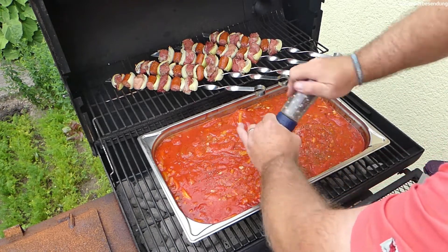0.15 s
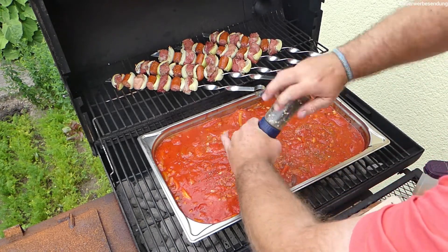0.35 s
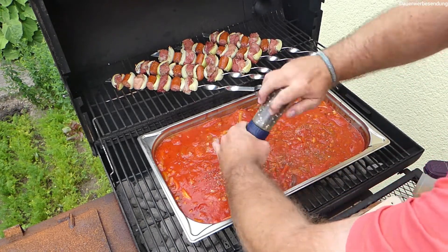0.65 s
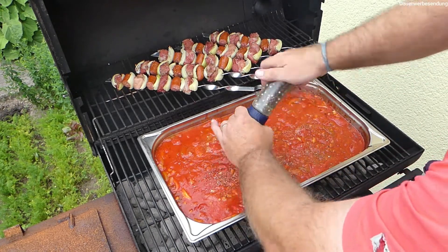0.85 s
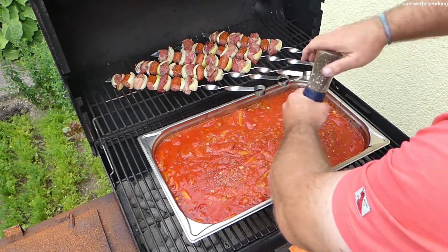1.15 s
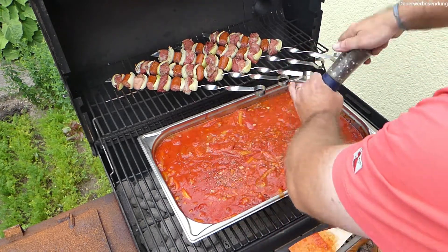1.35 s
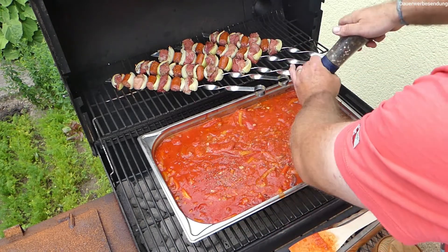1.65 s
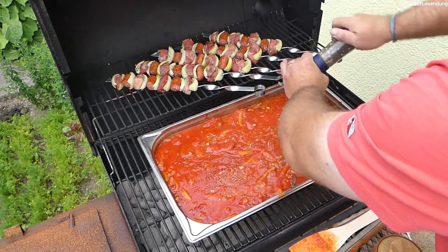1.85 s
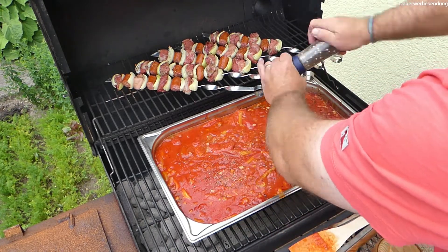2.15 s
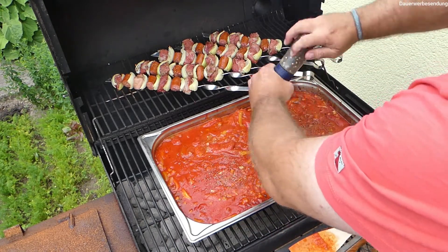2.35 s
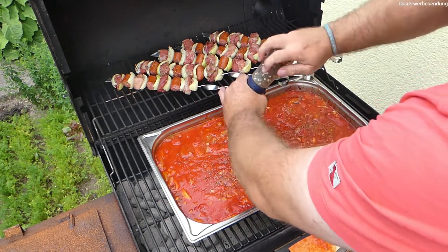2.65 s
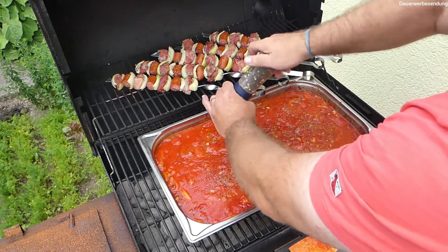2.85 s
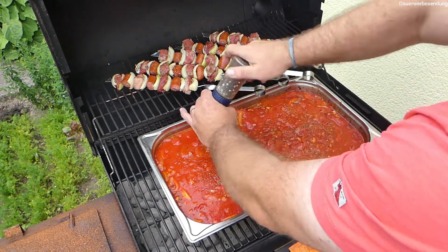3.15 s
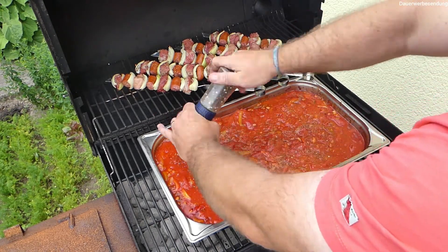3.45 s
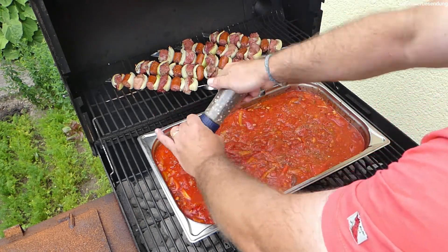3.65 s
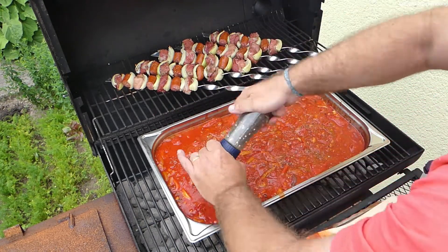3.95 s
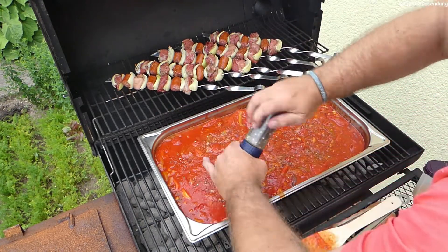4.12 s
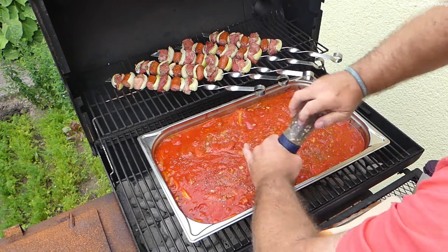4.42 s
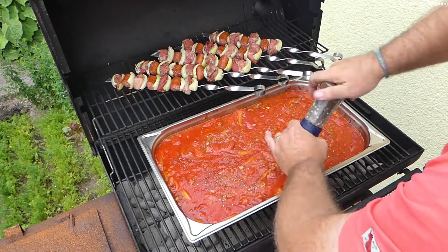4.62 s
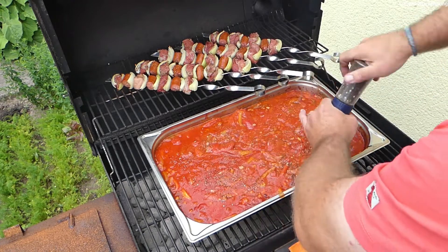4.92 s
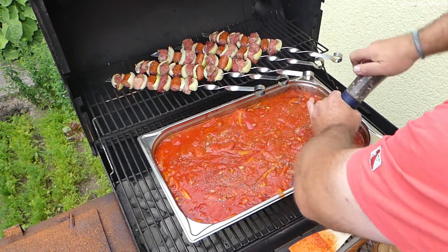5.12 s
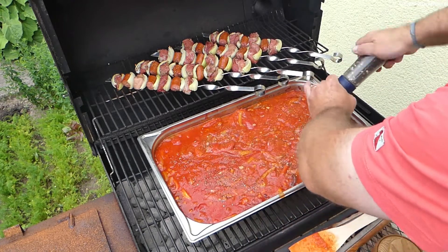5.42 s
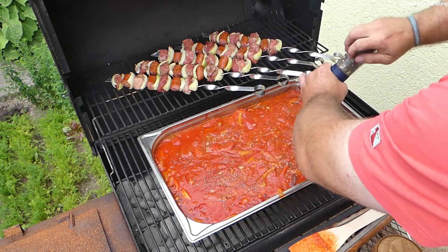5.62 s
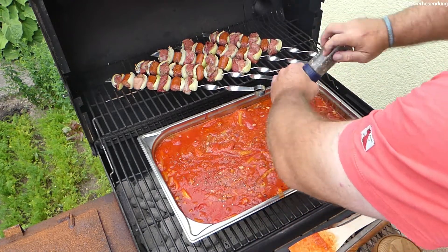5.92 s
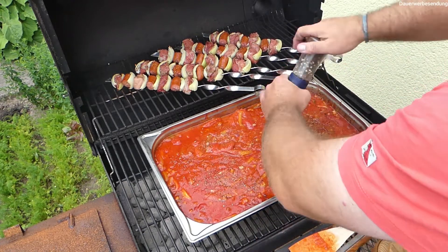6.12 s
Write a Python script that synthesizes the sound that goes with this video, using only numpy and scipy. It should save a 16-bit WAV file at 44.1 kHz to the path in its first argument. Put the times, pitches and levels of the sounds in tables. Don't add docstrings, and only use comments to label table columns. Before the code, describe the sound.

Steady short grinding strokes of a hand pepper mill, about four a second, with corns cracking and rattling above a soft grill flame.

```python
import sys
import numpy as np
from scipy import signal
from scipy.fft import rfft, irfft, next_fast_len
from scipy.io import wavfile
from scipy.ndimage import uniform_filter1d, map_coordinates

SR = 44100
rng = np.random.default_rng(int(sys.argv[2]) if len(sys.argv) > 2 else 0)


def put_to_file(sound):
    columns = np.atleast_2d(sound).T
    safe = np.clip(columns, -1, 1)
    whole_steps = np.round(safe * 32767)
    wavfile.write(sys.argv[1], SR, whole_steps.astype(np.int16))


def natural_amplitude(level_db):
    exponent = np.asarray(level_db, float) / 20
    return 10 ** exponent


N = 276939
CLOCK = np.arange(N) / SR

# hz, level_db (per Hz)
GRIT = [(290, 1), (500, -8.5), (844, -63), (1130, -11), (1990, -22), (2590, -12), (3080, -10), (5130, -4),
        (5600, -1.5), (6860, -4.5), (8920, 0.5), (14200, -9), (15500, -14.5), (16200, -74)]
SPLINTER_HZ = 2630


def unit(x):
    return x / np.sqrt(np.mean(x ** 2) + 1e-20)


def along(points, hz):
    f, value = np.transpose(points)
    return np.interp(np.log(hz + 1), np.log(f + 1), value)


def curves(rows):
    s, *columns = np.transpose(rows)
    return [np.interp(CLOCK, s, column) for column in columns]


def wobble(rate):
    knots = rng.standard_normal(int(N * 400 / SR) + 4)
    return map_coordinates(knots, [np.arange(N) * rate / SR])


def filtered(x, response):
    m = next_fast_len(N + 8192)
    return irfft(rfft(x, m) * response(np.fft.rfftfreq(m, 1 / SR)), m)[..., :N]


def highpassed(x, hz):
    return filtered(x, lambda f: 1 / (1 + (hz / (f + 1)) ** 4))


def coloured(x, spectrum):
    return unit(filtered(x, lambda hz: natural_amplitude(along(spectrum, hz))))


def resonance(hz, width_hz):
    return lambda f: 1j * f * width_hz / (hz * hz - f * f + 1j * f * width_hz)


def placed(start_s, sounds):
    at = np.round(np.ravel(start_s) * SR).astype(int)[:, None] + np.arange(sounds.shape[1])
    return np.bincount(at.ravel(), sounds.ravel(), N + SR)[:N]


def grains(per_second, scatter_db, life, smooth):
    chance, luck = rng.random((2, N))
    size = natural_amplitude(scatter_db * -np.log(luck + 0.03)) * (chance < per_second / SR)
    puffs = signal.lfilter([1], [1, -np.exp(-1 / (life * SR))], size)
    return unit((unit(puffs) + smooth) * rng.standard_normal(N))


def patchy(x, depth_db):
    z = signal.stft(x, nperseg=256)[2]
    field = uniform_filter1d(rng.standard_normal(z.shape), size=4, axis=0)
    field = unit(uniform_filter1d(field, size=4, axis=1))
    return unit(signal.istft(z * natural_amplitude(depth_db * field), nperseg=256)[1][:N])


def stroke():
    # start_s, attack_s, length_s, bite_db, end_db
    twists = [(0.082, 0.024, 0.11, -15.5, -19.5), (0.368, 0.021, 0.1, -20.5, -16),
              (0.653, 0.0048, 0.11, -15, -21.5), (0.93, 0.017, 0.14, -22.5, -20),
              (1.187, 0.049, 0.14, -17, -19), (1.476, 0.025, 0.14, -12.5, -22.5),
              (1.787, 0.021, .12, -17, -26.5), (2.057, 0.018, 0.12, -15.5, -18),
              (2.36, 0.0045, 0.15, -15.5, -22), (2.669, 0.015, 0.13, -16.5, -22.5),
              (2.963, 0.013, 0.12, -17, -20.5), (3.209, 0.038, 0.14, -20.5, -19.5),
              (3.573, 0.075, 0.15, -17.5, -49.5), (3.839, 0.014, 0.11, -19.5, -16.5),
              (4.137, 0.0067, 0.13, -14, -26.5), (4.416, 0.037, 0.12, -18.5, -18),
              (4.689, 0.013, 0.15, -20, -20.5), (4.948, 0.11, 0.21, -16, -20),
              (5.304, 0.028, 0.14, -13, -21.5), (5.607, 0.027, .11, -17.5, -18),
              (5.883, 0.022, 0.13, -14, -18), (6.159, 0.05, .12, -16, -17.5)]
    # body_hz, ring_db (over grit at full load), hollow_db
    grips = [(1760, -3.5, -7), (1710, -2, -23), (1900, -7.5, 0), (2180, -5.5, 0), (1560, -2.5, -15),
             (2130, -6, -1), (1950, 0, -4), (2090, -4.5, 1), (2150, -5.5, 0.5), (2100, -7.5, 4),
             (2130, -7, 2), (2030, -4, -8), (2020, 2, -5), (1950, -9.5, 3), (2140, -10.5, 6),
             (2150, -4, -6), (1470, -4.5, -8), (1600, -7.5, -30), (2080, -9.5, -0.5), (2050, -5.5, 2),
             (1970, -10.5, -9), (2150, -7.5, 1)]
    creep_s, release_s, stop_s = 0.017, 0.039, 0.034
    foot_db, release_db = -17, -17
    rows = []
    for (s, attack, length, bite_db, end_db), (hz, ring_db, hollow_db) in zip(twists, grips):
        unloaded_db, faded_db = ring_db - 10, ring_db - 14
        end = s + length
        let_go = end + release_s
        rows += [(s - creep_s, -70, unloaded_db, hz, hollow_db),
                 (s, bite_db + foot_db, unloaded_db, hz, hollow_db),
                 (s + attack, bite_db, unloaded_db, hz, hollow_db),
                 (end, end_db, ring_db, hz, hollow_db),
                 (let_go, end_db + release_db, faded_db, hz, hollow_db),
                 (let_go + stop_s, -60, faded_db, hz, hollow_db)]
    return curves(sorted(rows))


def burr():
    # middle_s, half_length_s, level_db
    jams = [
        (0.433, 0.01, -19),
        (3.308, 0.015, -36),
        (5.109, 0.0055, -30),
    ]
    # hz, level_db (per Hz)
    body_colour = [(250, -17), (500, -9), (1000, -9), (1800, -11.5), (2600, -8.5), (3600, -22), (6000, -42)]
    grit_db, ring_db, grip_hz, hollow_db = stroke()
    grit_db = grit_db + sum(db * np.exp(-((CLOCK - s) / half) ** 2) for s, half, db in jams)
    clumps = natural_amplitude(0.69 * wobble(60))
    crush = clumps * grains(650, scatter_db=-0.5, life=0.0026, smooth=0.98)
    grit = coloured(patchy(crush, depth_db=2.0), GRIT) + 0.35 * pings(450, scatter_db=3.5)
    shake = natural_amplitude(1.5 * wobble(50)) * clumps * grains(500, scatter_db=1, life=0.00087, smooth=1.2)
    broad = coloured(patchy(shake, depth_db=2.2), body_colour)
    mode_hz = np.geomspace(1000, 2800, num=8)
    weights = np.exp(-(np.log(grip_hz / mode_hz[:, None]) / 0.14) ** 2)
    rings = np.array([unit(filtered(shake, resonance(hz, 0.045 * hz))) for hz in mode_hz])
    hollow = np.sum(weights * rings, axis=0) / np.sqrt(np.sum(weights ** 2, axis=0) + 1e-6)
    body = broad + natural_amplitude(hollow_db) * hollow
    return natural_amplitude(grit_db - 1.43) * grit + natural_amplitude(grit_db + ring_db - 6.0) * body


def pings(per_second, scatter_db):
    when, kind, detune, luck = rng.random((int(per_second * N / SR), 4)).T[:, :, None]
    t = np.arange(160)
    hz = np.where(kind < 0.7, 8900, 5700) * np.exp(0.35 * (detune - 0.5))
    size = natural_amplitude(scatter_db * -np.log(luck + 0.013))
    ring = np.sin(2 * np.pi * hz * t / SR) * np.exp(-t / 22) * (1 - np.exp(-t / 6))
    return unit(placed(when * N / SR, size * ring))


def splinters(count):
    f = np.fft.rfftfreq(SR // 10, 1 / SR)
    spot_hz = rng.uniform(5900, 10800, (count, 1))
    spot = 1.36 + 1.13 * np.exp(-((f - spot_hz) / 1200) ** 2)
    noise = irfft(rfft(rng.standard_normal((count, SR // 10))) * natural_amplitude(along(GRIT, f)) * spot)
    return noise / noise.std(axis=1, keepdims=True)


def cracks():
    # start_s, peak_db
    quick = [(0.178, 1.5), (0.255, -9), (0.391, -1.5), (0.753, 2.5), (0.9455, -5), (1.153, -14),
             (1.257, -1.5), (1.2737, 1), (1.45, -8.5), (1.525, 2.5), (1.5417, 0.5), (1.884, 2.5),
             (2.1735, 2), (2.3686, 1), (2.382, 1), (2.487, -2), (2.6869, 4.5), (2.74, 0), (2.758, -4),
             (3.843, -2), (3.8574, 3.5), (4.257, -7.5), (4.377, -7.5), (4.7313, 4), (4.8458, -3),
             (5.0817, 1.5), (5.1153, -22), (5.4255, 0), (5.7017, -0.5), (6.2366, -7)]
    # start_s, peak_db
    slow = [(0.111, 4), (0.453, -7), (0.6555, -4), (.7, -2), (0.959, 3), (0.9744, 3), (1.047, -2),
            (1.1179, -6), (1.2194, -0.5), (1.3093, -1.5), (1.371, -7.5), (1.476, -9), (1.5968, -0.5),
            (1.8938, -4), (2.098, 4.5), (3.0575, -1), (3.256, 0), (3.3146, 1.5), (4.149, 0), (4.23, -6),
            (4.435, -1.5), (4.5213, 0), (4.7128, 1), (4.776, -1), (5.1446, -6.5), (5.33, -1.5),
            (5.635, 2.5), (5.648, -4), (5.913, 2.5), (6.0058, -3)]
    rows = [(*r, 0.0047) for r in quick] + [(*r, 0.0067) for r in slow]  # rise, s
    s, db, rise = np.transpose(rows)[:, :, None]
    u = np.arange(SR // 10) / SR / rise
    spray = natural_amplitude(db - 13.5) * splinters(len(rows)) * (u * np.exp(1 - u)) ** 0.85
    return highpassed(placed(s, spray), SPLINTER_HZ)


def chips():
    # start_s, peak_db
    breaking = [(0.101, -8), (0.1343, -8), (0.2249, -17), (0.4009, -2), (0.464, -8), (0.4846, 0),
                (0.7627, 4), (0.8549, -11), (0.9578, 0), (0.992, 2), (1.049, 0), (1.09, -10), (1.1211, -14),
                (1.155, -5), (1.2594, -6), (1.2725, -1), (1.371, -10), (1.542, 2), (1.5986, -1),
                (1.898, -2), (2.0907, -2), (2.097, -7), (2.1109, -4), (2.1797, -3), (2.442, -6),
                (2.7621, -11), (3.0485, -4), (3.0603, -6), (3.1447, -9), (3.2542, -9), (3.303, -16),
                (3.4227, -25), (3.4948, -11), (3.91, 3), (4.0015, -15), (4.1586, -1), (4.3807, -13),
                (4.4485, -2), (4.6154, -12), (4.7165, 0), (4.7272, -3), (4.735, -1.5), (4.7809, -12),
                (4.7902, -4), (4.8687, -3.5), (5.014, 2.5), (5.0562, 2), (5.0846, 0), (5.0988, -4),
                (5.1457, -5), (5.332, -2), (5.373, 5), (5.4258, 0), (5.6485, 1), (5.6569, -5), (5.718, -2),
                (5.9111, 2), (6.0047, -3), (6.2388, -4), (6.2515, -12)]
    # start_s, peak_db
    dropping = [(0.641, -10), (0.8375, -12), (2.9664, -12), (3.2191, -11), (3.4174, -18), (3.8364, -10),
                (4.1332, -13), (4.2904, -21), (4.3126, -24), (4.3184, -28), (4.3256, -26), (4.334, -26),
                (4.8774, -10), (4.9136, -19), (4.9282, -23)]
    s, db = np.transpose(breaking + dropping)[:, :, None]
    t = np.arange(SR // 40) / SR
    decay = natural_amplitude(db - 7 - 60 * t / 0.01)
    click = splinters(len(s))[:, :len(t)] * decay * (1 - np.exp(-t / 0.00026))
    return highpassed(placed(s, click), SPLINTER_HZ)


def knocks():
    # start_s, peak_db, ring_hz
    blows = [(0.188, -10, 1110), (0.4543, -13, 2030), (2.4636, -4.5, 1900), (2.7043, -22, 2680),
             (1.0325, -17, 2000), (3.162, -26.5, 1900), (3.3123, -5, 2370), (3.6326, -10.5, 1900),
             (4.057, -26.5, 2080), (4.2306, -3, 1896), (4.2325, -12.5, 1170), (5.1169, -7.5, 1500),
             (5.4528, -15, 2230), (6.2595, -8.5, 2540)]
    out, t = np.zeros(N + SR), np.arange(SR // 10) / SR
    dull = [.2, .2, .2, .2, 0, -.2, -.2, -.2, -.2]
    for s, db, hz in blows:
        near_hz = hz * np.array([0.58, 1.3, 2.1]) * np.exp(rng.normal(0, 0.14, 3))
        ring = 0.75 * natural_amplitude(-60 * t / 0.026) * np.sin(2 * np.pi * hz * t)
        modes = np.sin(2 * np.pi * near_hz[:, None] * t).sum(axis=0)
        ring = ring + 0.14 * natural_amplitude(-60 * t / 0.031) * modes
        snap = 2.3 * natural_amplitude(-60 * t / 0.007) * np.convolve(rng.standard_normal(len(t)), dull, "same")
        click = 1.4 * np.sin(2 * np.pi * t / 0.0003) * (t < 0.0003)
        blow = ring + snap + click
        second = np.pad(blow, (rng.integers(40, 80), 0))[:len(t)]
        out[round(s * SR):][:len(t)] += natural_amplitude(db - 3) * (blow + 0.35 * second)
    return out[:N]


def sings():
    # start_s, peak_db, pitch_hz, t60_s
    notes = [(0.115, -20, 2350, 0.061), (0.404, -17, 2440, 0.053), (0.455, -16, 2020, 0.05),
             (0.477, -11, 1147, 0.024), (0.644, -26, 2600, 0.042), (0.658, -27, 1580, 0.05),
             (0.737, -21, 1260, 0.044), (0.955, -18.5, 2470, 0.057), (1.032, -12, 2080, 0.044),
             (1.227, -27, 2160, 0.05), (1.262, -28, 1700, 0.05), (1.277, -15.5, 1530, 0.041),
             (1.332, -14, 1667, 0.043), (1.344, -19, 1610, 0.038), (1.5, -21, 2590, 0.045),
             (1.539, -21, 2500, 0.039), (1.576, -27, 2060, 0.05), (1.819, -15, 2650, 0.047),
             (2.086, -19, 2440, 0.05), (2.132, -20, 2100, 0.067), (2.368, -26, 2190, 0.044),
             (2.419, -30, 2170, 0.038), (2.441, -11, 2280, 0.041), (2.719, -16.5, 2300, 0.062),
             (2.746, -9.5, 2170, 0.036), (2.798, -24, 2070, 0.038), (2.982, -17, 2013, 0.044),
             (3.044, -14.5, 2020, 0.039), (3.077, -20, 2100, 0.063), (3.268, -17.5, 1880, 0.054),
             (3.334, -15.5, 1950, 0.075), (3.613, -20, 1950, 0.057), (3.911, -15, 2054, 0.062),
             (3.929, -14, 2113, 0.046), (4.148, -34, 2100, 0.034), (4.459, -24, 2820, 0.096),
             (4.525, -21, 1170, 0.036), (4.823, -20, 1190, 0.04), (4.88, -33, 1520, 0.04),
             (5.087, -14.5, 2090, 0.052), (5.134, -16, 1335, 0.039), (5.33, -30, 1370, 0.042),
             (5.386, -18.5, 1050, 0.038), (5.629, -15, 2470, 0.041), (5.649, -24, 2100, 0.046),
             (5.68, -17, 2226, 0.054), (5.712, -11.5, 2130, 0.04), (5.894, -23.5, 1680, 0.054),
             (5.966, -19.5, 2090, 0.072), (6.192, -12, 3020, 0.033)]
    s, db, hz, t60 = np.transpose(notes)[:, :, None]
    t = np.arange(SR // 8) / SR
    flutter = uniform_filter1d(rng.standard_normal((len(s), 2, len(t))), size=50, axis=2)
    flutter = 0.75 * flutter / flutter.std()
    phase = 2 * np.pi * hz * t
    note = (1 + flutter[:, 0]) * np.sin(phase) + flutter[:, 1] * np.cos(phase)
    note = natural_amplitude(db - 2.3 - 60 * t / t60) * (1 - np.exp(-t / 0.0015)) * note
    return placed(s, note)


def loose_corns():
    # middle_s, half_length_s, level_db
    slides = [(0, 0.043, -34.5), (0.242, 0.036, -25), (.33, 0.062, -41), (0.56, 0.1, -30.5),
              (0.83, 0.11, -32), (1.136, 0.032, -17), (1.392, 0.048, -23.5), (1.714, 0.092, -29),
              (2.03, 0.087, -33.5), (2.231, 0.081, -29), (2.584, 0.15, -37.5), (2.912, 0.051, -28.5),
              (3.168, 0.032, -31), (3.466, 0.088, -28.5), (3.7, 0.12, -29), (4.06, 0.026, -34),
              (4.37, 0.041, -25), (4.627, 0.043, -38), (4.953, 0.046, -35), (5.266, 0.036, -30),
              (5.548, 0.21, -32.5), (5.804, 0.094, -31.5), (6.083, 0.061, -30)]
    # hz, level_db (per Hz)
    rattle = [(590, -64), (1000, -11), (1370, -8.5), (1500, -7), (1920, -10.5), (2660, -8.5), (3400, -10),
              (4440, -2.5), (9930, 0.5), (16200, -15)]
    # start_s, peak_db
    snaps = [(.0857, 0.5), (.6585, 6), (.9759, -7), (1.2198, 2), (1.4775, -4), (1.5274, 4.5), (1.8067, -2),
             (2.3984, -8), (2.6878, -3), (3.3134, 1), (3.582, -10), (3.8574, -5), (4.15, 0.5),
             (4.1978, -11), (4.2312, -5), (4.258, -19), (4.438, -3), (5.3541, 8), (5.4524, -4),
             (5.4737, -12)]
    # start_s, peak_db
    ticks = [(0.2256, -5.5), (.328, -17), (0.553, -12.5), (0.629, -9), (0.815, -1), (.855, -11),
             (0.8957, -11.5), (0.914, -14), (1.6823, -11.5), (1.9854, -18), (2.2576, -12), (2.5698, -18),
             (2.914, -21), (2.942, -7.5), (3.1448, -14.5), (3.424, -6.5), (3.4533, -16), (3.497, -14),
             (3.768, -17), (4.002, -10), (4.085, -15), (4.109, -12), (4.5942, -9), (4.615, -11),
             (4.954, -12), (5.2579, -19), (5.491, -8), (5.561, -14), (5.7748, -9.5), (5.7898, -13)]
    level = sum(natural_amplitude(db) * np.exp(-((CLOCK - s) / half) ** 2) for s, half, db in slides)
    level = level + natural_amplitude(stroke()[0] - 1.5)
    rustle = natural_amplitude(3.46 * wobble(25)) * grains(110, scatter_db=-10.0, life=0.0014, smooth=1.3)
    rustle = coloured(patchy(rustle, depth_db=1.8), rattle)
    strays = [(N / SR * a, -30 + 19.5 * (2 * b - 1)) for a, b in rng.random(size=(60, 2))]
    s, db = np.transpose(snaps + ticks + strays)[:, :, None]
    t = np.arange(SR // 10) / SR
    decay = natural_amplitude(-60 * t / 0.0065) + 0.21 * natural_amplitude(-60 * t / 0.082)
    tap = natural_amplitude(db - 8.0) * splinters(len(s)) * (1 - np.exp(-t / 0.00016)) * decay
    taps = highpassed(placed(s, tap), 3440)
    return taps + natural_amplitude(-4.5) * level * rustle


def squeaks():
    # start_s, length_s, start_hz, end_hz, level_db
    whistles = [
        (2.285, .07, 12600, 11500, -49),
        (2.565, .095, 12650, 12200, -51),
        (2.595, .03, 9000, 8750, -51),
        (4.89, .022, 10600, 11900, -46),
    ]
    out = np.zeros(N)
    for s, length, start_hz, end_hz, db in whistles:
        n = round(length * SR)
        phase = 2 * np.pi * np.cumsum(np.linspace(start_hz, end_hz, n)) / SR
        out[round(s * SR):][:n] += natural_amplitude(db) * np.hanning(n) ** 0.5 * np.sin(phase)
    return out


def palm():
    # start_s, peak_db
    thumps = [
        (0.654, -40),
        (0.936, -28),
        (1.475, -32.5),
        (2.358, -35),
        (5.307, -29),
        (0.082, -33),
    ]
    s, db = np.transpose(thumps)[:, :, None]
    t = np.arange(SR // 10) / SR
    push = natural_amplitude(db + 13.5 - 60 * t / 0.0098) * np.sin(2 * np.pi * 415 * t)
    return placed(s, push * (1 - np.exp(-t / 0.0011)))


def hood(x):
    # hz, t60_s
    decay = [(125, 0.39), (500, 0.095), (2000, 0.11), (8000, 0.0088), (15000, 0.003)]
    hz, t, z = signal.stft(rng.standard_normal((6, 2, SR // 4)), SR, nperseg=128)
    tails = signal.istft(z * natural_amplitude(-60 * t / along(decay, hz)[:, None]), SR, nperseg=128)[1]
    tails = tails / np.linalg.norm(tails[0, 0])
    place = (CLOCK / 0.07).astype(int) % len(tails)
    parts = np.pad(x * (place == np.arange(len(tails))[:, None]), ((0, 0), (60, 0)))
    return signal.fftconvolve(parts[:, None], tails, axes=2).sum(axis=0)[:, :N]


def burners():
    # time_s, drone_db
    draught = [(0, -64), (1.3, -48), (1.7, -59), (3.1, -50.5), (3.4, -48), (3.6, -45.5), (4.15, -44.5),
               (4.35, -63), (4.55, -47), (5.1, -48), (5.6, -60.5), (6.28, -52)]
    # hz, level_db (per Hz)
    flame = [(13, -55), (22, -21), (64, -16.5), (118, -2.5), (210, -6), (325, 2.5), (421, -3.5), (663, 0.5),
             (986, -5), (1130, -3.5), (1380, -13.5), (2500, -10), (3250, -45), (5500, -120)]
    # hz, level_db (per Hz)
    air = [(1500, -18), (3500, -6.5), (6000, -9), (12000, -14), (16000, -9)]
    drone_db, = curves(draught)
    drone = filtered(rng.standard_normal(N), lambda f: resonance(324, 34)(f) ** 2)
    drone = natural_amplitude(drone_db - 1.2 + 1.2 * wobble(11)) * unit(drone)
    rush = np.array([patchy(noise, depth_db=2.5) for noise in rng.standard_normal((2, N))])
    rush = natural_amplitude(-42.9 + 0.95 * wobble(4.3)) * coloured(rush, flame)
    low = filtered(rush, lambda f: 1 / (1 + (f / 266) ** 4))
    draught_db = drone_db - drone_db.mean()
    sunk_db = 1.47 * CLOCK
    rush = natural_amplitude(0.32 * draught_db) * low + natural_amplitude(0.11 * draught_db - sunk_db) * (rush - low)
    hiss = natural_amplitude(-50 + 5.1 * wobble(24)) * coloured(rng.standard_normal((2, N)), air)
    mid = drone + rush[0] + hiss[0]
    side = natural_amplitude(-16) * rush[1] - 0.027 * (drone + rush[0]) + natural_amplitude(-3.5) * hiss[1]
    return np.array([mid, side])


def scene():
    # hz, side_minus_mid_db
    spread = [(200, -7), (700, -27), (1500, -23), (2500, -22), (4400, -18.5), (8000, -14), (15000, -7)]
    mill = burr() + loose_corns() + cracks() + knocks() + sings() + chips() + squeaks()
    mill = highpassed(mill, 520)
    echo, fire = hood(mill), burners()
    mid = mill + natural_amplitude(-12) * echo[0] + fire[0] + palm()
    wide = filtered(echo[1], lambda hz: natural_amplitude(along(spread, hz)))
    side = wide.std() * patchy(natural_amplitude(0.51 * wobble(12)) * wide, depth_db=8.5)
    side = highpassed(side, 300) + fire[1]
    return np.array([mid + side, mid - side]) * natural_amplitude([[-0.3], [0.3]])


def roll_off(x):
    return signal.sosfilt(signal.butter(12, 16510, fs=SR, output="sos"), x)


def record(dry):
    # hz, gain_db
    mic = [(15, -32), (40, -1), (90, -4), (200, -2.5), (20000, -2.5)]

    def response(f):
        notch = 1 - 0.86 * resonance(5925, 130)(f)
        return natural_amplitude(along(mic, f)) * (f < 15950) * notch

    mix = filtered(np.clip(dry, -1.1, 1.1), response)
    return roll_off(mix)


dry = scene()
out = record(dry)
put_to_file(out)
```